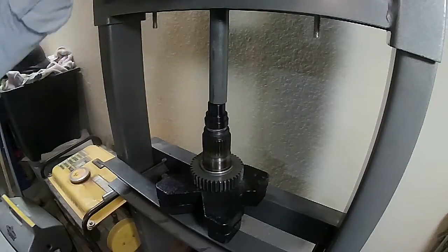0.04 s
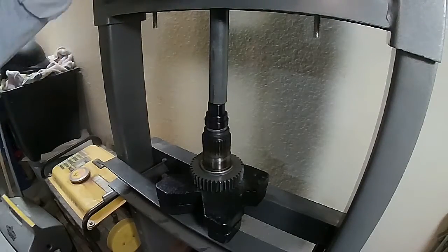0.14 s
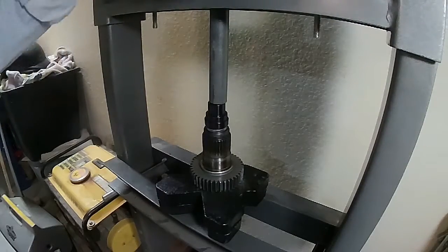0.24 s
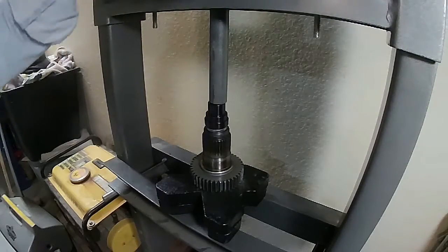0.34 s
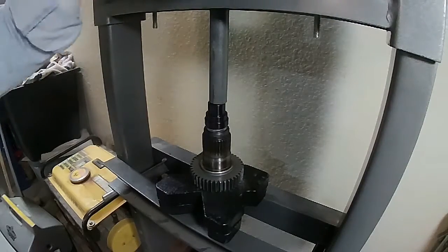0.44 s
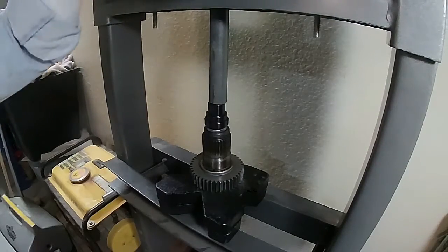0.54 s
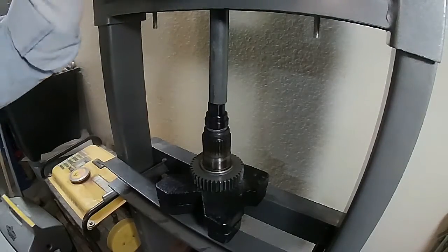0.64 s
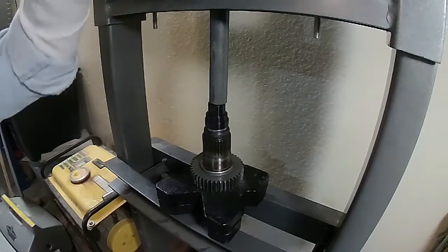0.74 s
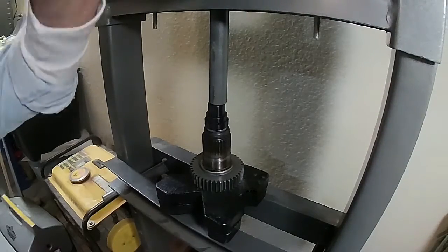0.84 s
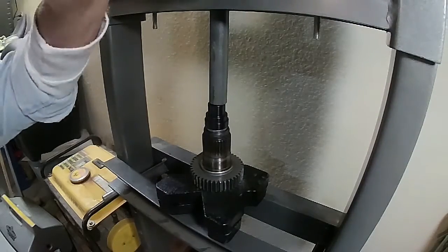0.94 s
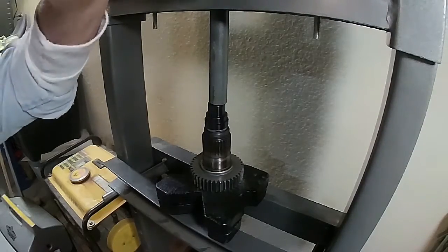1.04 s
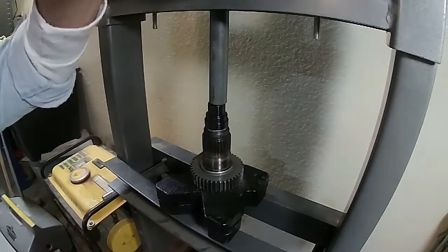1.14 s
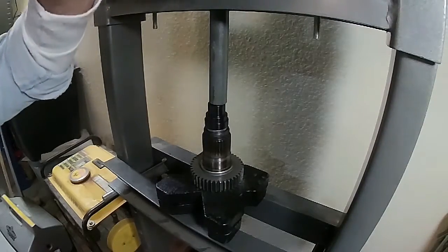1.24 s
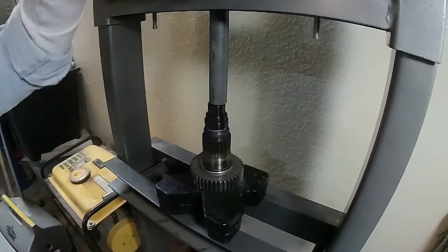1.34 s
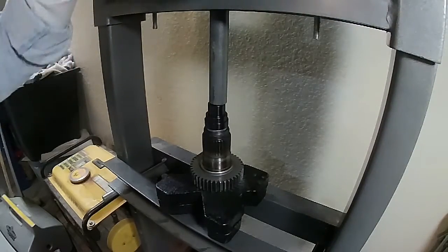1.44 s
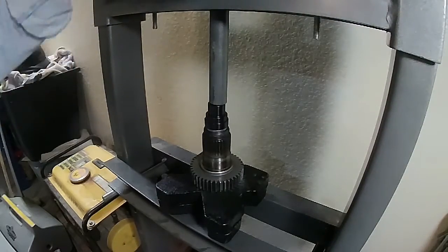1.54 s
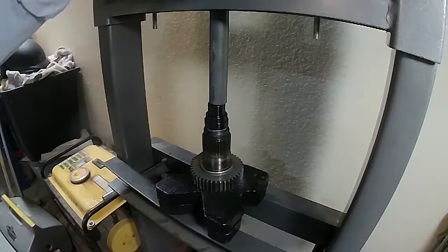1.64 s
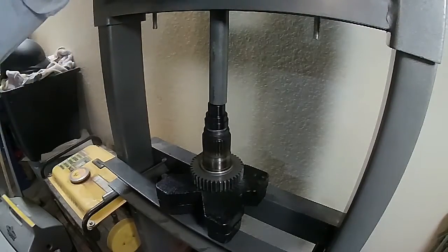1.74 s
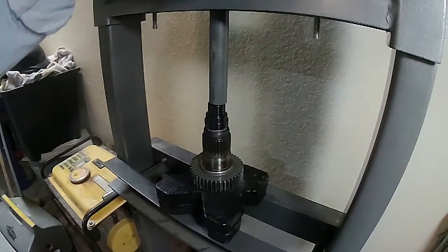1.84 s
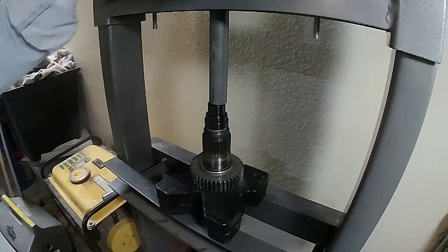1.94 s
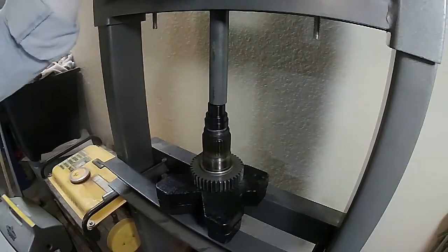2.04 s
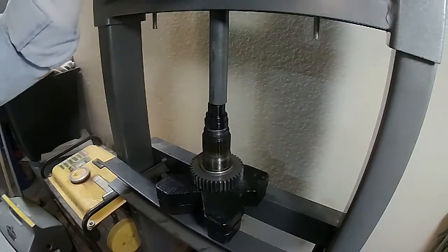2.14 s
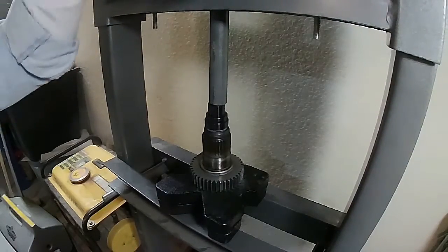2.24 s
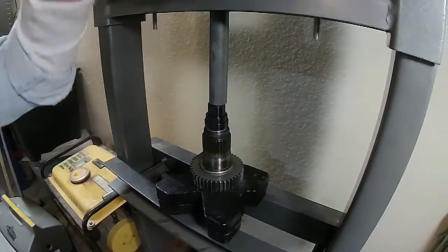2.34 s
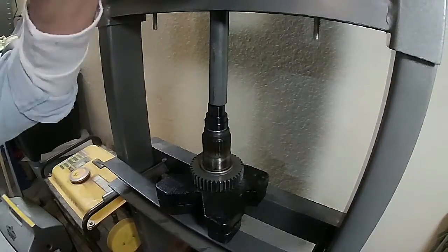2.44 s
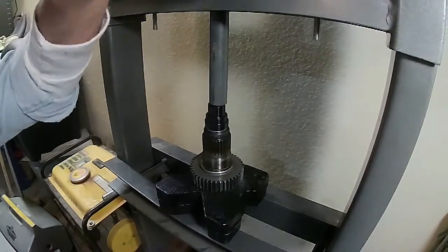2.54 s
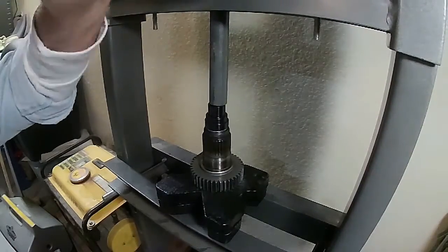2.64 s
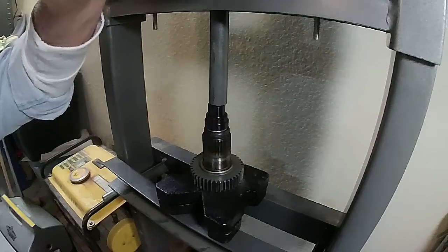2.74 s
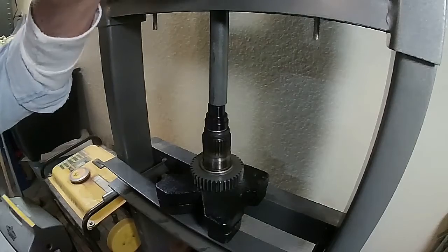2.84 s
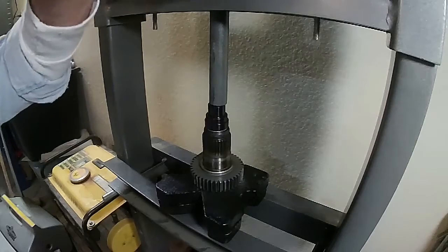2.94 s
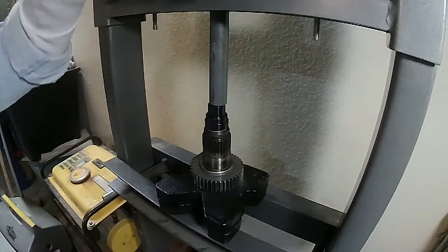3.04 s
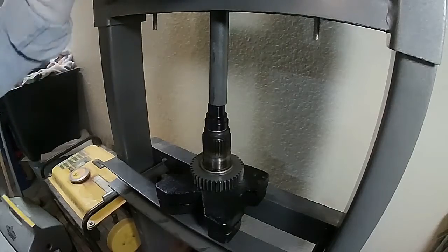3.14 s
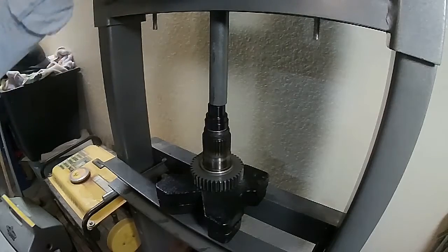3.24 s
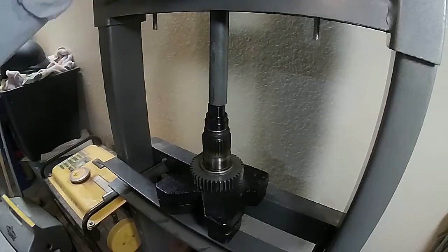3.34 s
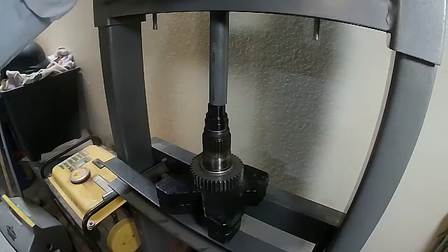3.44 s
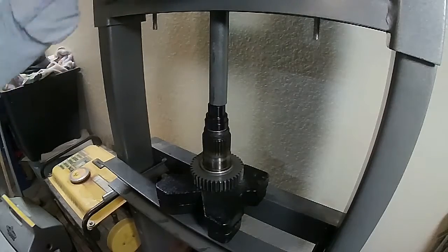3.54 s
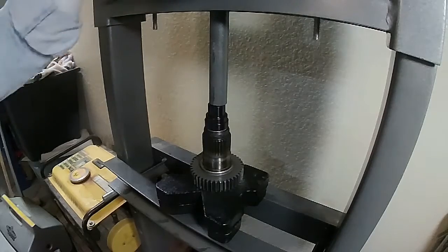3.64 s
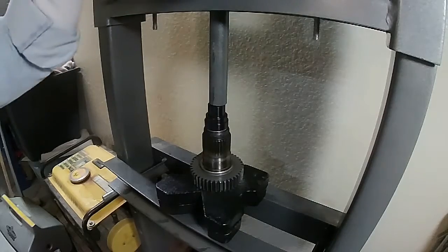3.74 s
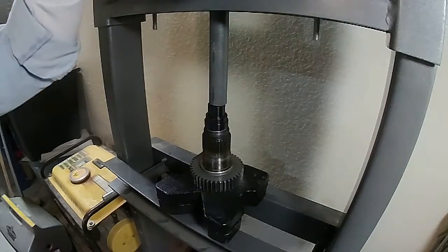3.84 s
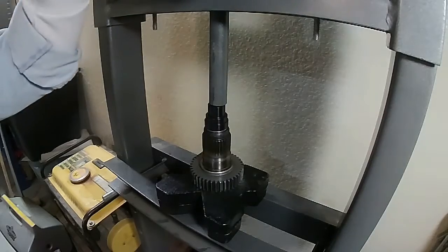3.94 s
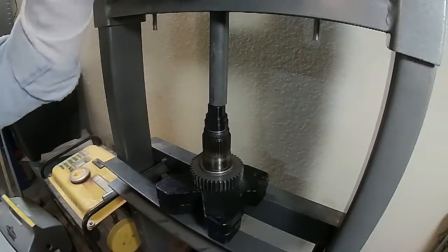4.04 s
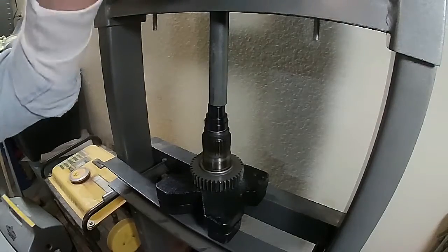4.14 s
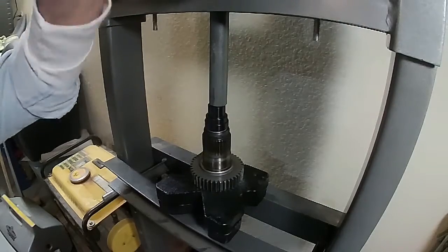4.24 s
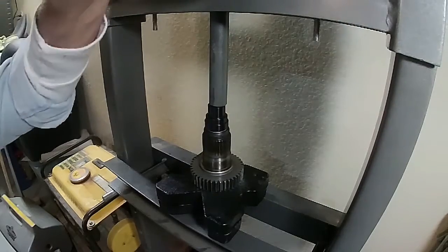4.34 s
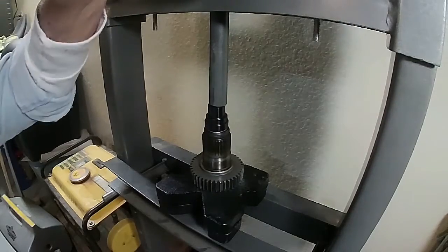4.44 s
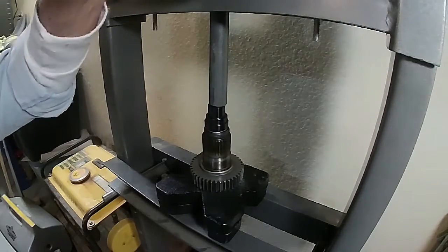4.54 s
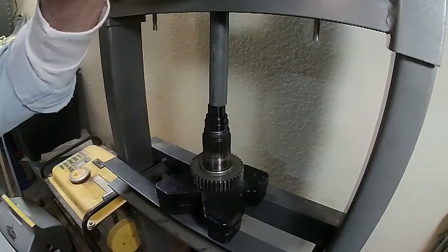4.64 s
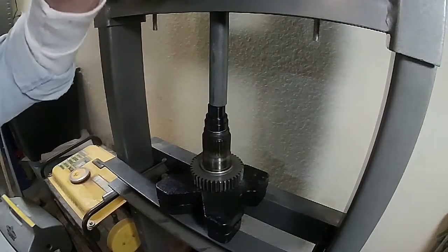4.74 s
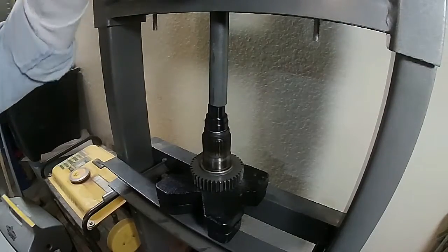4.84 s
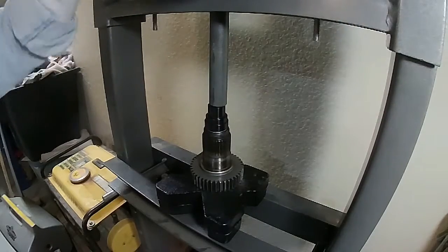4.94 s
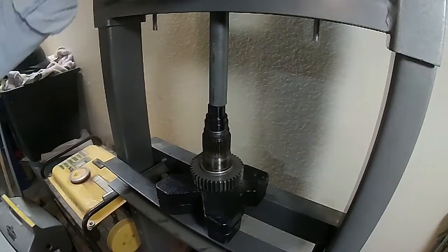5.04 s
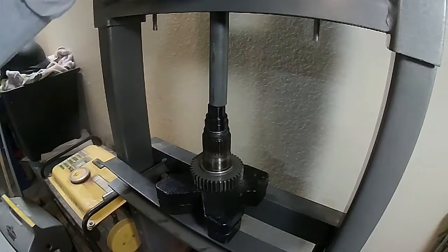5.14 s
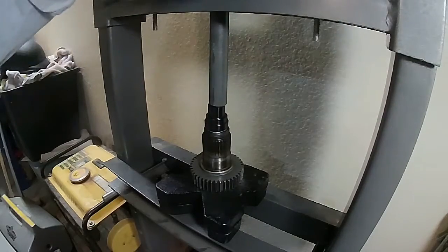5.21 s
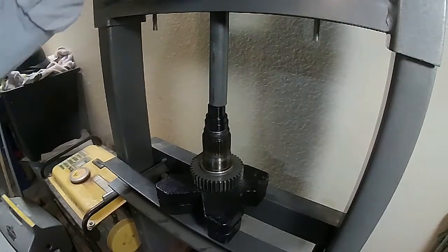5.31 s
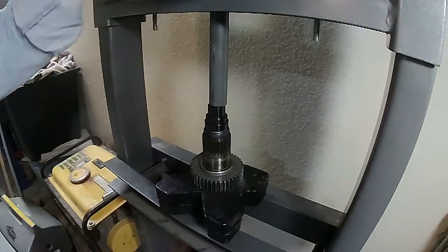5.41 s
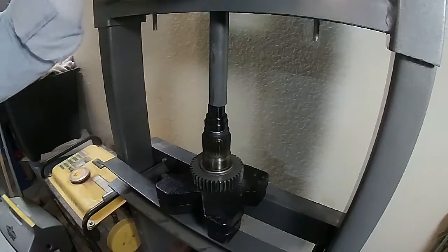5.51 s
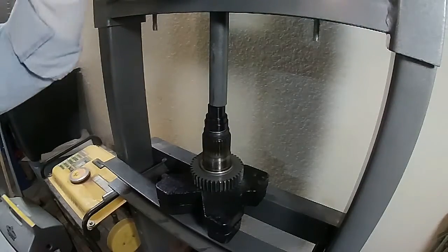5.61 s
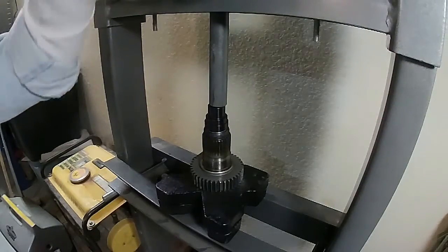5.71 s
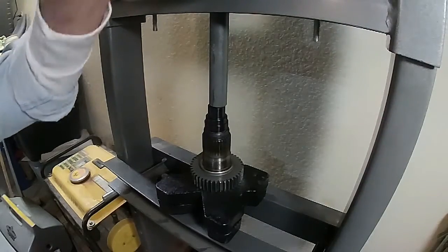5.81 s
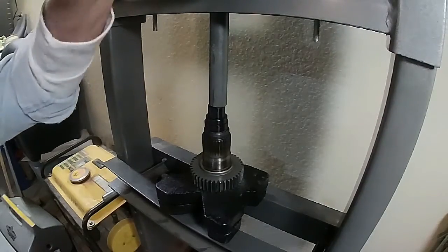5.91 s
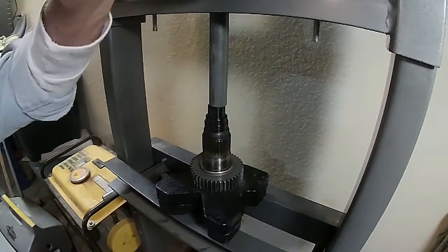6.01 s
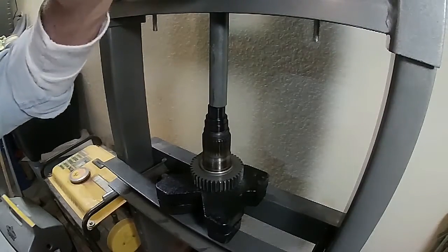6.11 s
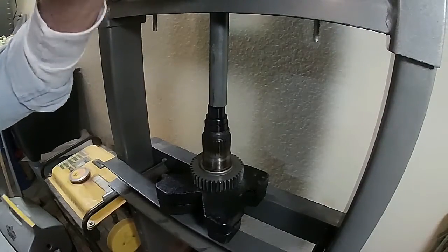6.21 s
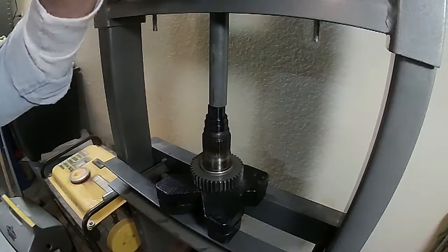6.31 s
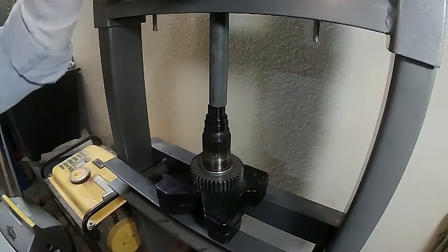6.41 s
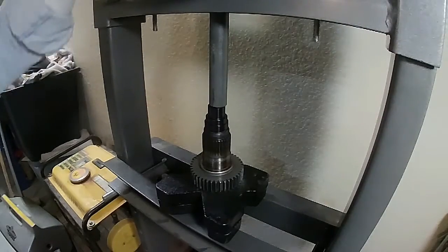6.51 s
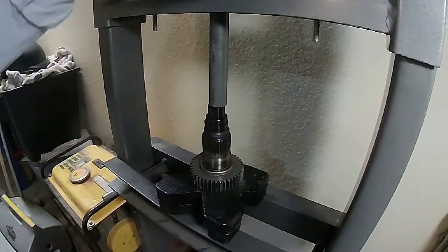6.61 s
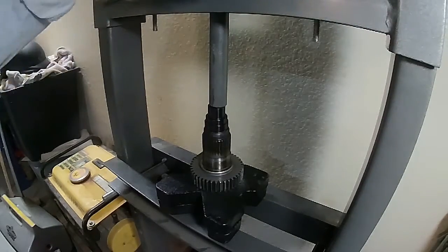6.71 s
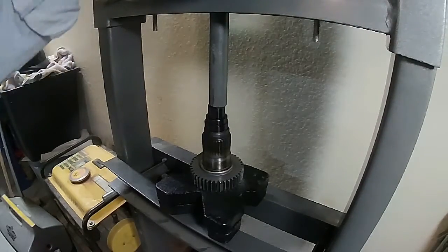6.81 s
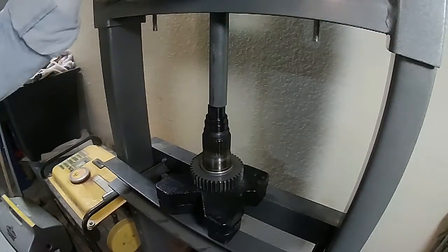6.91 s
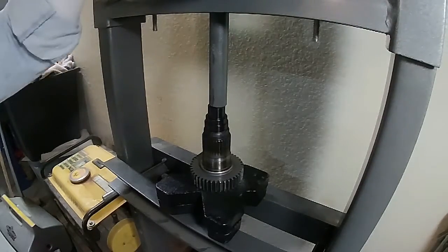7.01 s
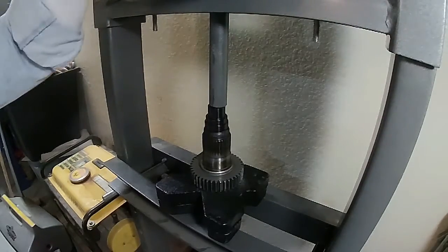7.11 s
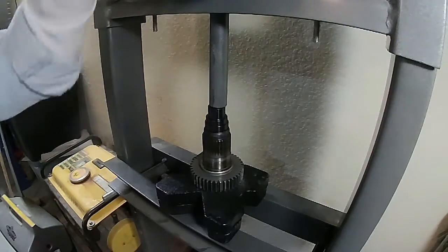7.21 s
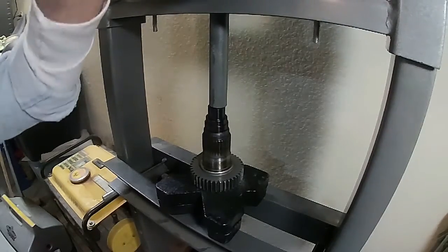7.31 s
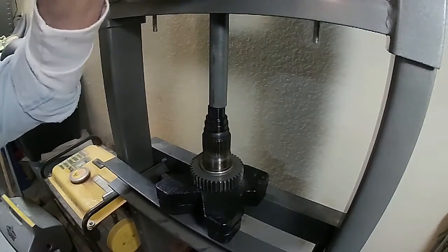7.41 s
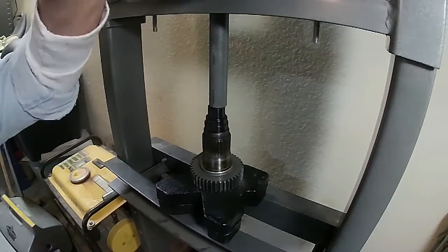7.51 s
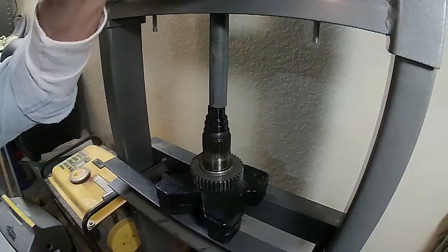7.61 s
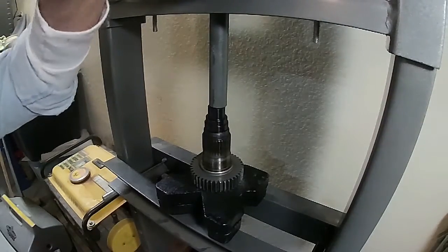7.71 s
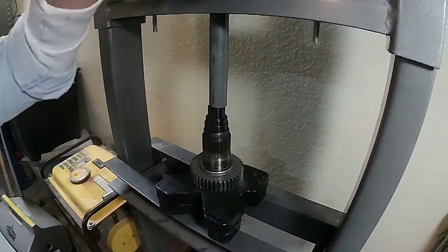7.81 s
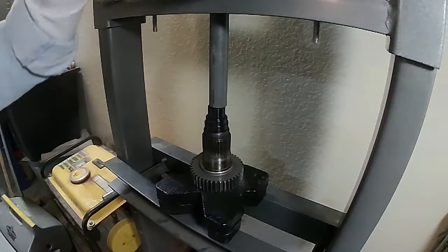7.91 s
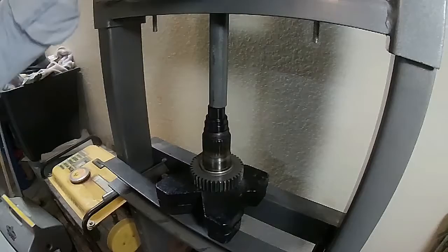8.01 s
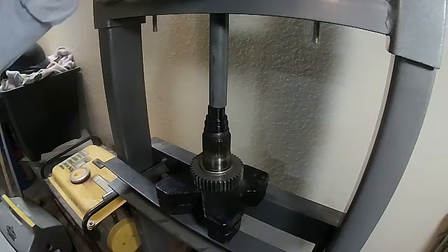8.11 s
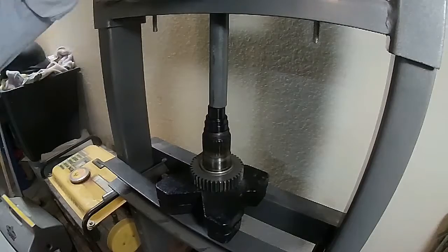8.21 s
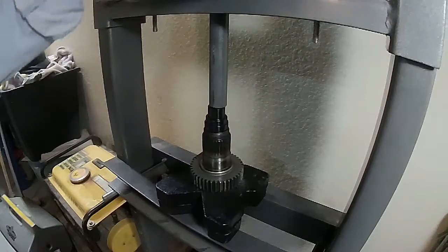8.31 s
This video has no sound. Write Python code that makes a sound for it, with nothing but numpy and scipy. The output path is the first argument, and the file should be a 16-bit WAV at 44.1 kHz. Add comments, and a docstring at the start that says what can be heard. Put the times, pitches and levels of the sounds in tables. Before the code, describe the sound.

Close, overloaded steel bangs burst in quick clusters as a bearing jumps under a press, with lighter handle clacks, small ticks and a lingering beating ring.

```python
"""Shop press, close microphone

A hand-worked shop press pushes a bearing along a shaft in five strokes, close to an overloaded microphone.
Under load the tight fit sticks and jumps: each jump bangs the steel frame (noise and damped sines),
shakes loose parts and leaves a long ring of beating partials. The handle clacks in its pivot at the top
of each stroke and ticks as it turns at the bottom; a small room answers, over low room noise and a swish."""
import sys
import numpy as np
from scipy import signal
from scipy.fft import rfft, irfft, next_fast_len
from scipy.io import wavfile
from scipy.ndimage import map_coordinates

SR = 44100
rng = np.random.default_rng(int(sys.argv[2]) if len(sys.argv) > 2 else 0)


def dump(signal):
    """Clip the signal to [-1, 1] and save it as 16-bit WAV at the path in sys.argv[1]."""
    limited = np.clip(np.atleast_2d(signal).T, -1, 1)
    pcm = np.round(limited * 32767).astype(np.int16)
    wavfile.write(sys.argv[1], SR, pcm)


N = 368676
T = np.arange(int(2.6 * SR)) / SR  # time axis of the longest single ring [s]

# All levels in the tables are relative within their layer.
# jumps of the bearing:
# (time [s], force [dB], treble [dB], lasting ring [dB], shaft [dB])
JUMPS = [(0.561, -2.5, 2, -12.5, -13.5), (0.669, -4, -1, 0, -10.5), (.773, -2.5, -3.5, -1, -10),
         (2.157, 0, 2, -1.5, -6), (2.256, 0, -6, 2, -7.5), (2.482, 1, -1, 3, -3), (3.937, 0.5, 0.5, 4, -10),
         (4.18, 4, -4.5, 0, -2), (5.594, 0, 2.5, 3, -17.5), (5.688, -2, -6.5, -1, -26),
         (7.078, 3, 0, 0, -12), (7.178, -1, -1, 1, -11)]
# steel clash of a jump, noise spectrum: (frequency [Hz], level [dB])
CLASH_SPECTRUM = [(15, -43.5), (25, -16.5), (84, -3.5), (242, -9), (335, -5), (591, -11), (1190, -11),
                  (1790, -9.5), (2550, -20), (3620, -7.5), (4370, -19.5), (6210, -26), (7310, -38),
                  (9070, -39), (16000, -47.5)]
# its decay: (frequency [Hz], t60 [s])
CLASH_T60 = [(40, 0.86), (130, 0.43), (500, 0.26), (900, 0.43), (1300, 0.72), (2200, 0.36), (3600, 1),
             (8000, 0.52), (15000, 0.2)]
# heavy modes of the frame: (frequency [Hz], level [dB], t60 [s])
FRAME_MODES = [(53.5, -14.5, 0.84), (76.7, -19, 1), (89.93, -12.5, .8), (112.4, -18, 0.44),
               (217, -14, 0.13), (237, -8, 0.09), (346, -13, 0.14), (363, -19, 0.32), (726, -20.5, 0.38),
               (757, -6.5, 0.041), (804, -17.5, 0.16), (978, -15.5, .2), (1227, -17.5, 0.28),
               (1212, -23.5, 0.88), (1364, -20, 0.84), (1326, -18.5, 0.86), (1500, -29, 0.21),
               (1800, -14.5, 0.3), (1910, -27.5, 0.1), (2980, -21, 0.086), (3670, -24.5, 0.21),
               (6400, -26.5, 0.14)]
# shaft, gear and press plates: (frequency [Hz], level [dB])
STEEL_MODES = [(2353, -58), (2519, -60), (2864, -57), (3079, -71.5), (3343, -76), (3435, -54.5),
               (3596, -45), (3677, -52.5), (3887, -57), (4054, -46.5), (4156, -64), (4350, -65.5),
               (4484, -62), (4775, -70), (4936, -62), (5168, -65.5), (5690, -86), (5873, -76.5),
               (6045, -75), (6148, -60.5), (6293, -56.5), (6503, -69), (6767, -60), (6896, -84),
               (7450, -84), (8576, -75)]
# their decay: (frequency [Hz], t60 [s])
STEEL_T60 = [(2000, 0.51), (3500, 0.61), (6000, 0.46), (9000, 0.49)]
# strength of the faint plate modes: (frequency [Hz], level [dB])
PLATE_SPECTRUM = [(1700, 11.5), (2100, 7), (2600, -8), (3000, -4), (3600, 5.5), (4300, -6), (6300, -5),
                  (7300, -32), (9200, -19), (11000, -48.5)]
# brief ring of gear and bearing at every jump: (frequency [Hz], level [dB], t60 [s])
GEAR_MODES = [(2098, -22, 0.23), (2904, -11.5, 0.14), (3074, -18.5, 0.4), (3470, -31, 0.32),
              (3690, -12, 0.14), (3615, -12, 0.14), (3880, -28, .35), (4170, -16.5, 0.17),
              (4400, -22.5, 0.2), (4830, -25, 0.34), (5950, -25, 0.32)]
# long, thin ring of the shaft: (frequency [Hz], level [dB], t60 [s])
SHAFT_MODES = [(2153, -37.5, 1), (3270, -46, 1.2), (5143, -44.5, 2.5), (6870, -53.5, 0.77)]
# loose parts, noise spectrum: (frequency [Hz], level [dB])
RATTLE_SPECTRUM = [(60, -6), (250, 10.5), (550, 5), (1000, 9.5), (1350, 4.5), (2000, -7.5), (2600, -16),
                   (3700, -37.5), (8000, -74.5)]
# lasting ring of the frame and springs: (frequency [Hz], level [dB])
SPRING_MODES = [(86.1, -42.5), (209.9, -54.5), (279.9, -51.5), (349.9, -46), (586.8, -57), (1077, -46),
                (1227, -42.5), (1340, -46), (1416, -74.5), (1480, -44.5), (1615, -46.5)]
# crowd of close coil modes, noise spectrum: (frequency [Hz], level [dB])
COIL_SPECTRUM = [(40, -12), (85, 2), (150, -33.5), (320, -1.5), (500, -16.5), (980, -9), (1150, 3.5),
                 (1450, 3), (1620, -7), (1780, -34), (5000, -34), (9000, -76.5)]
# handle clacking home at the top of a stroke:
# (time [s], lead-in length [s], click [dB], knock [dB], lead-in [dB])
TOPS = [(.292, 0.056, -13.5, -15.5, 2.5), (1.802, 0.057, -9.5, -14, -4.5), (3.481, 0.046, -14.5, -21, -4.5),
        (5.303, 0.059, -8, -20.5, -9), (6.813, .054, -8.5, -14, -2), (8.28, 0.046, -14, -15.5, -9)]
# slack taken up joint by joint, ever harder: (share of the lead-in still to go [1], click [dB], knock [dB])
TOP_PLAY = [(1, -19.5, -30), (2 / 3, -5, -15.5), (1 / 3, -2.5, -1.6)]
# handle turning at the bottom of a stroke:
# (time [s], lead-in length [s], click [dB], knock [dB], lead-in [dB], swish of the lift [dB])
TURNS = [(1.305, 0.068, -21.5, -27, 0, -57), (2.997, 0.065, -19.5, -28, 4, -58),
         (4.745, 0.06, -22, -33.5, -5.5, -68), (6.338, .05, -24, -27, 6, -69),
         (7.808, 0.026, -29, -28.5, 1, -64)]
# pin crossing its slack almost unloaded: (share of the lead-in still to go [1], click [dB], knock [dB])
TURN_PLAY = [(1, -5.5, -7.5), (0.57, -3.5, -9)]
# stray knocks and ticks as work and handle settle: (time [s], click [dB], knock [dB])
SETTLES = [(.828, -24.5, -13), (5.053, -44.5, -51), (5.903, -35, -18.5), (8.116, -33, -43)]
# pin click, noise spectrum: (frequency [Hz], level [dB])
CLICK_SPECTRUM = [(300, -12.5), (1200, 2), (2300, -7.5), (3200, -3), (3750, 6), (4400, -3.5), (5500, -9.5),
                  (7300, -10.5), (8200, -19.5), (9100, -16.5), (11500, -34), (15000, -24.5)]
# handle knock, noise spectrum: (frequency [Hz], level [dB])
KNOCK_SPECTRUM = [(60, -5.5), (250, -9.5), (430, -7), (560, -2), (700, -3), (1000, -2.5), (1220, 2.5),
                  (1400, 4.5), (1600, -4.5), (2200, -12.5), (6000, -48)]
# the handle's own modes: (frequency [Hz], level [dB], t60 [s])
LEVER_MODES = [(800, -4.5, 0.17), (910, -2.5, 0.16), (1026, -5, 0.19), (1205, 0, 0.34), (1585, -3, 0.13)]
# hollow bump of a stop, changing as the ram travels:
# (time [s], frequency [Hz], level against the stop's knock [dB])
BUMP = [(.3, 522, -9), (1.8, 553, -1), (3.5, 596, -10), (6.8, 582, -3.5), (8.301, 613, -16.5)]
# decay of the room: (frequency [Hz], t60 [s])
ROOM_T60 = [(100, 1), (1000, 0.66), (4000, 0.42), (8000, 0.34), (15000, .16)]
# low room noise, spectrum: (frequency [Hz], level [dB])
AIR_SPECTRUM = [(15, -53), (25, 3.5), (108, -6), (170, -13.5), (263, -13), (384, -18.5), (545, -18.5),
                (677, -39), (734, -13.5), (1260, -30), (1790, -26.5), (1940, -31.5), (2990, -44.5),
                (6740, -42), (16000, -54)]
# sleeve and sliding handle, noise spectrum: (frequency [Hz], level [dB])
SWISH_SPECTRUM = [(1500, -28), (2500, 4), (4000, 5), (5600, -3.5), (7200, -4), (9000, -9.5), (15000, -24.5)]
# thin hisses as the handle moves:
# (start [s], length [s], centre [Hz], half-width [Hz], level before the fades [dB])
HISSES = [(1.309, 0.42, 6864, 450, -62), (2.701, 0.25, 4780, 220, -49), (2.713, .25, 5700, 260, -50)]

THUD_DB = -3.5  # frame modes below 150 Hz, alike for every jump; also trims the lows of the clash
GEAR_DB = -2.5  # gear within the clash
RATTLE_DB = -12  # loose parts, against the force of the jump
FLIGHT_S, SETTLE_S = .055, .11  # longest flight of loose parts; time constant of their settling
LEVER_DB, LEVER_GROWS = -16.5, 2.5  # handle jolted by a jump: level, and dB per dB of force
SPLIT_HZ = 2100  # dull and bright parts of the clash
SWISH_REST_DB = -64.5  # sleeve and handle between lifts
SWISH_RISE_S, SWISH_FALL_S = 0.053, 0.35  # swell of each lift
TOP_HZ = 16000  # band limit


def bangs():
    """Each jump thumps the frame; the bright clash of steel follows at once, then loose parts land."""
    out, size = np.zeros(N), SR
    t = T[:size]
    # parts fly longer the more time they had to settle since the last jump
    rests = np.diff([s for s, *_ in JUMPS], prepend=-np.inf)
    flights = FLIGHT_S * (1 - np.exp(-rests / SETTLE_S))
    for (s, db, treble_db, _, shaft_db), flight, shimmer in zip(JUMPS, flights, plates(count=90)):
        clash = dying(noise(CLASH_SPECTRUM, size), CLASH_T60)
        clash = clash * flutter(rate=190, depth_db=2, size=size)  # the parts chatter on each other

        dull = filtered(clash, lambda hz: lowpass(hz) * amp(THUD_DB / (1 + (hz / 110) ** 2)))
        dull = dull * (1 + 0.41 * fade(t60=0.35, size=size))
        add(out, s, amp(db - 6.5) * dull * (1 - np.exp(-t / 0.0011)))

        bright = filtered(clash, lambda hz: 1 - lowpass(hz))
        bright = bright * (amp(-7.5) * fade(t60=0.3, size=size) + amp(2.0) * fade(t60=0.09, size=size))
        # round parts ring in close pairs that beat, detuned a little at random at every jump
        pairs = [(hz + rng.normal(0, 9), level, along(STEEL_T60, hz)) for hz, level in 2 * list(STEEL_MODES)]
        steel = ring(pairs, scatter_db=1.5, size=size)
        gear = ring(GEAR_MODES, scatter_db=4.5, size=size)
        treble = bright + amp(16.5) * steel + amp(-14.5) * shimmer + amp(GEAR_DB) * gear
        add(out, s + .0015, amp(db + treble_db) * treble * (1 - np.exp(-t / 0.0034)) ** 2)

        frame = [(hz * (1 + rng.normal(0, .007)), level + (THUD_DB if hz < 150 else db), t60)
                 for hz, level, t60 in FRAME_MODES]
        add(out, s, ring(frame, scatter_db=5.0, size=size))

        loose = noise(RATTLE_SPECTRUM, size) * fade(t60=0.39, size=size)
        loose = loose * flutter(rate=100, depth_db=1.5, size=size)
        add(out, s + flight, amp(db + RATTLE_DB) * loose * (1 - np.exp(-t / 0.0068)))

        lever = ring(LEVER_MODES, scatter_db=1.0, size=size)
        add(out, s, amp(LEVER_DB + LEVER_GROWS * db) * lever)

        shaft = ring(SHAFT_MODES, scatter_db=4.5, size=len(T))
        add(out, s, amp(shaft_db) * shaft * flutter(rate=7.1, depth_db=4.0, size=len(T)))
    return out


def lowpass(hz):
    """The share of the clash below SPLIT_HZ; its complement is the bright part."""
    return 1 / (1 + (hz / SPLIT_HZ) ** 6)


def plates(count):
    """A crowd of close steel modes; every jump strikes the same ones at new strengths."""
    hz = np.linspace(1700, 11000, count) * (1 + rng.normal(0, .025, count))
    t60 = along(STEEL_T60, hz) * rng.uniform(.6, 1.1, count)
    # single precision keeps the large mode matrix small
    t, hz32 = np.float32(T[:SR]), np.float32(hz)[:, None]
    rate = np.float32(np.log(1000) / t60)[:, None]
    waves = np.sin(np.float32(2 * np.pi) * hz32 * t) * np.exp(-rate * t)
    strength = amp(along(PLATE_SPECTRUM, hz))
    blows = rng.standard_normal((len(JUMPS), count)) * strength / np.linalg.norm(strength)
    return np.float32(blows) @ waves


def springs():
    """Beating pairs of partials and a crowd of close coil modes sing on from one stroke to the next."""
    out, size = np.zeros(N), len(T)
    for s, _, _, ring_db, _ in JUMPS:
        pairs = [(hz + rng.normal(0, 2.456), level, 3.47 * (hz / 1000) ** -.3)
                 for hz, level in 2 * list(SPRING_MODES)]
        clear = ring(pairs, scatter_db=5.0, size=size)
        crowd = noise(COIL_SPECTRUM, size) * fade(t60=3.12, size=size)
        crowd = crowd * flutter(rate=14, depth_db=1.0, size=size)
        add(out, s, amp(ring_db) * (amp(3.0) * clear + amp(-32.0) * crowd))
    # still ringing from an earlier stroke
    add(out, 0, amp(-43.5) * noise(COIL_SPECTRUM, size) * fade(t60=3.9, size=size))
    return out


def handle():
    """A pin clicks in its hole and the handle knocks; both spread through the frame and the room."""
    out, size = np.zeros(N), SR // 3
    t = T[:size]
    pin_modes = [(3520, -13, 0.037), (3700, -10.5, 0.075), (3900, -3.0, 0.012), (6700, -25.0, 0.14)]
    for s, click_db, knock_db in contacts():
        tick, tap = noise(CLICK_SPECTRUM, size), noise(KNOCK_SPECTRUM, size)
        click = tick * (fade(t60=0.016, size=size) + amp(-2) * fade(t60=0.072, size=size))
        click = click + amp(-15.5) * dying(tick, ROOM_T60)
        pin = ring(pin_modes, scatter_db=10.0, size=size)
        # with no weight behind it the pin rings freely and cracks less
        free_db = 0.14 * np.clip(click_db - knock_db + 4.5, 0, 20)
        touch = amp(-free_db) * click + amp(free_db) * pin
        add(out, s, amp(click_db - 4.5) * touch * (1 - np.exp(-t / 0.00038)))

        knock = amp(-3.5) * tap * fade(t60=0.14, size=size) + amp(-5.5) * dying(tap, ROOM_T60)
        lever = ring(LEVER_MODES, scatter_db=1.5, size=size)
        add(out, s, amp(knock_db - 4.5) * (knock + lever) * (1 - np.exp(-t / 0.0012)))
    times, pitches, levels = np.transpose(BUMP)
    for s, _, _, knock_db, *_ in TOPS + TURNS:
        hz, bump_db = np.interp(s, times, pitches), np.interp(s, times, levels)
        bump = np.sin(2 * np.pi * hz * t) * fade(t60=0.27, size=size)
        add(out, s + 0.0037, amp(knock_db + bump_db) * bump)
    return out


def contacts():
    """Touches at each joint's slack lead in to every stop of the handle: (time [s], click [dB], knock [dB])."""
    rows = list(SETTLES)
    for stops, play in ((TOPS, TOP_PLAY), (TURNS, TURN_PLAY)):
        for s, lead_s, click_db, knock_db, lead_db, *_ in stops:
            for share, click, knock in play:
                rows.append((s - share * lead_s, click_db + lead_db + click, knock_db + lead_db + knock))
            rows.append((s, click_db, knock_db))
    return rows


def workshop():
    """Low room noise, the faint swish of sleeve and sliding handle, and thin bands of hiss."""
    out = amp(-40.5) * noise(AIR_SPECTRUM, N) + swish_gain() * noise(SWISH_SPECTRUM, N)
    for s, length, centre_hz, width_hz, db in HISSES:
        size = int(length * SR)
        hiss = filtered(rng.standard_normal(size), lambda hz: 1 / (1 + ((hz - centre_hz) / width_hz) ** 4))
        add(out, s, amp(db) * unit(hiss) * signal.windows.tukey(size, .5))
    return out


def swish_gain():
    """The swish swells and fades as the handle is lifted after each turn."""
    t = np.arange(N) / SR
    gain = np.full(N, amp(SWISH_REST_DB))
    for s, *_, db in TURNS:
        gain += amp(db) * np.interp(t - s, [0, SWISH_RISE_S, SWISH_RISE_S + SWISH_FALL_S], [0, 1, 0])
    return gain


def ring(modes, scatter_db, size):
    """Damped sines (frequency [Hz], level [dB], t60 [s]) at new strengths and phases for every blow."""
    t = T[:size].astype(np.float32)
    waves = 0
    for hz, db, t60 in modes:
        strength = float(amp(db + scatter_db * rng.standard_normal()))
        phase = float(rng.uniform(0, 2 * np.pi))
        decay = np.exp(-float(np.log(1000) / t60) * t)
        waves = waves + strength * decay * np.sin(float(2 * np.pi * hz) * t + phase)
    return waves * (1 - np.exp(-T[:size] / 0.00073))  # soft onset


def dying(x, t60s):
    """Each frequency of x dies at its own speed."""
    hz, t, z = signal.stft(x, SR, nperseg=512)
    decay = amp(-60 * t / along(t60s, hz)[:, None])
    return signal.istft(z * decay, SR, nperseg=512)[1][:len(x)]


def flutter(rate, depth_db, size):
    """A random gain, joined by straight lines in dB between rate knots a second."""
    knots = rng.standard_normal(size // 100)
    return amp(depth_db * map_coordinates(knots, [T[:size] * rate], order=1, mode="mirror"))


def fade(t60, size):
    """A decay by 60 dB in t60 seconds."""
    return amp(-60 * T[:size] / max(t60, 1e-3))


def noise(spectrum, size):
    """Coloured noise of rms 1."""
    return unit(filtered(rng.standard_normal(size), lambda hz: amp(along(spectrum, hz))))


def filtered(x, response):
    """x times a response of frequency."""
    m = next_fast_len(len(x) + 4096)
    return irfft(rfft(x, m) * response(np.fft.rfftfreq(m, 1 / SR)), m)[:len(x)]


def along(points, hz):
    """Interpolate (frequency [Hz], value) points on a log frequency axis."""
    f, v = np.transpose(points)
    return np.interp(np.log(hz + 1), np.log(f), v)


def amp(db):
    """Decibels to amplitude."""
    return 10 ** (np.asarray(db) / 20)


def unit(x):
    """Scale x to rms 1."""
    return x / np.sqrt(np.mean(x ** 2) + 1e-20)


def add(track, s, x):
    """Mix x into the track from s seconds on."""
    part = track[max(round(s * SR), 0):][:len(x)]
    part += x[:len(part)]


def scene():
    """The press, its lasting ring, the handle and the room around them, on one channel."""
    return (bangs() + springs() + handle() + workshop())[None]


def record(dry):
    """The close microphone flattens the peaks of the bangs; nothing is kept above the band limit."""
    top, hardness = 1.02, 7  # ceiling in amplitude; a higher hardness bends later and more sharply
    clipped = dry[0] / (1 + np.abs(dry[0] / top) ** hardness) ** (1 / hardness)
    return filtered(clipped, lambda hz: hz < TOP_HZ)[None]


dry = scene()
out = record(dry)
dump(out)
```